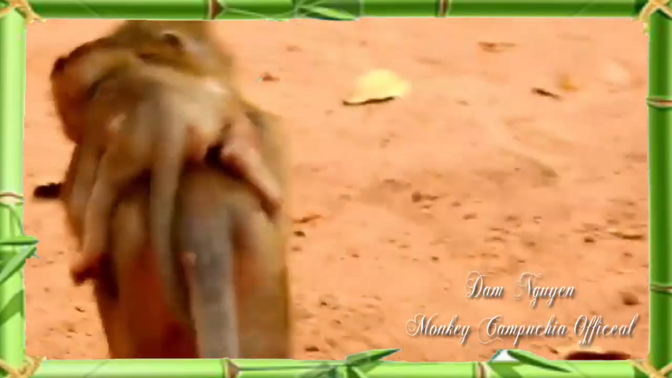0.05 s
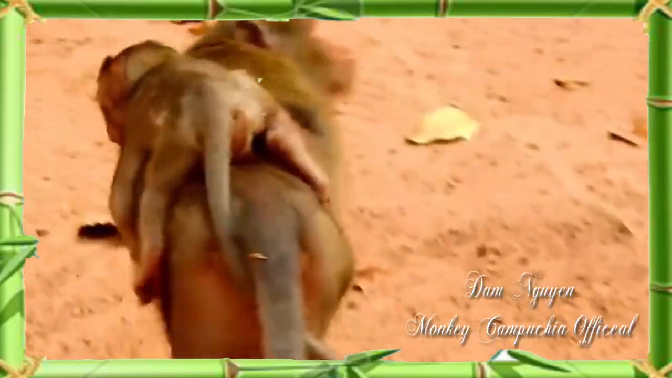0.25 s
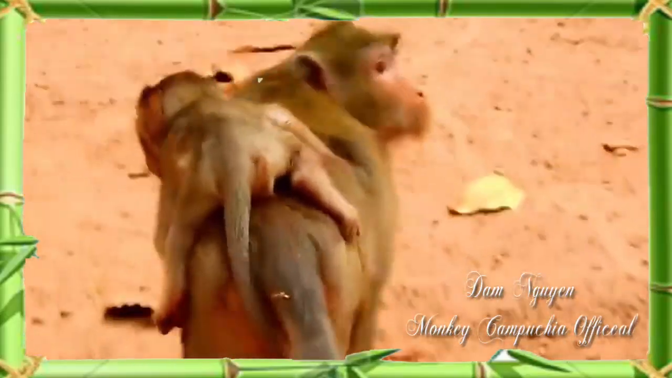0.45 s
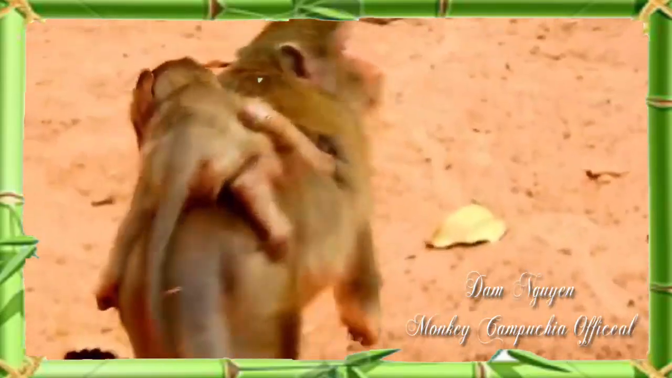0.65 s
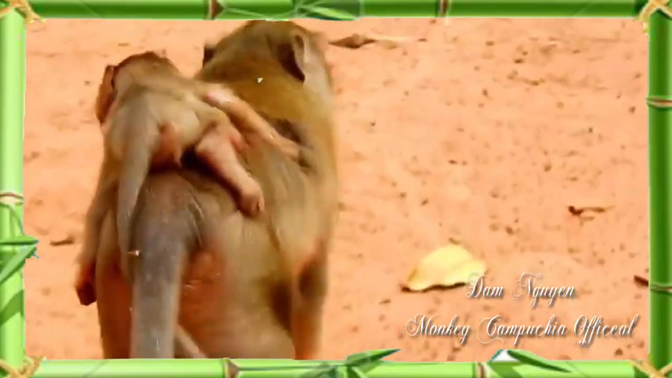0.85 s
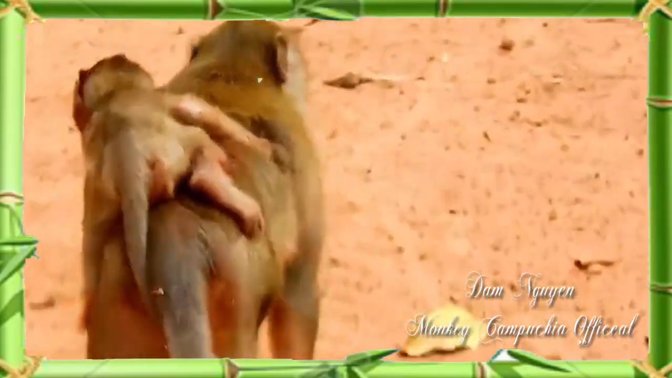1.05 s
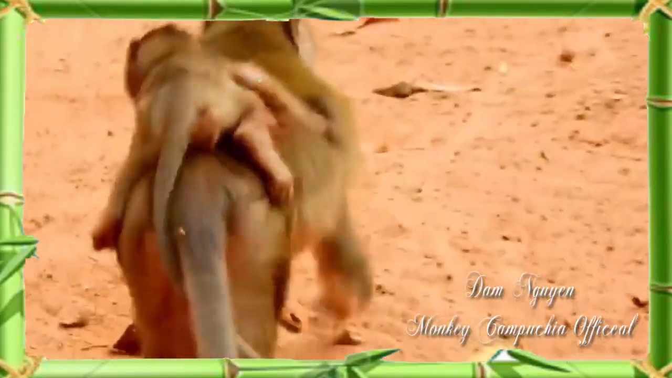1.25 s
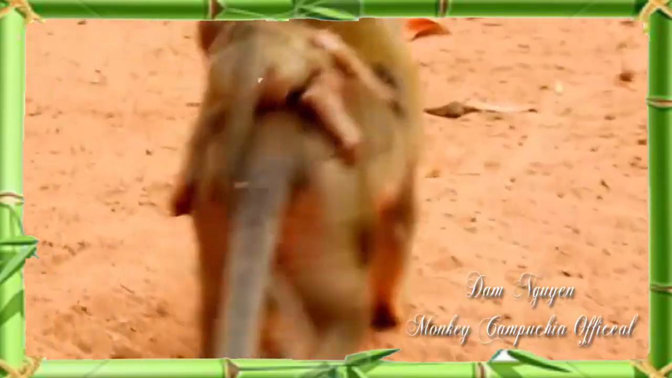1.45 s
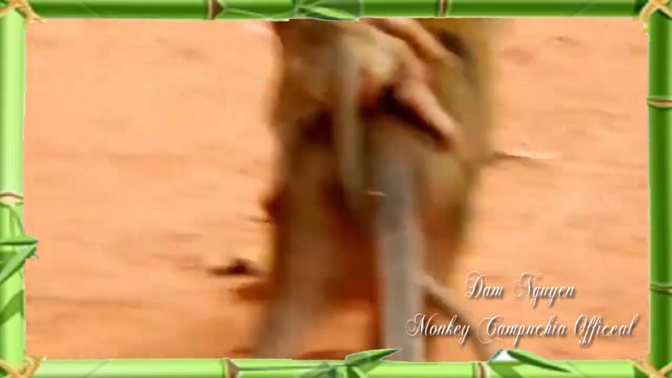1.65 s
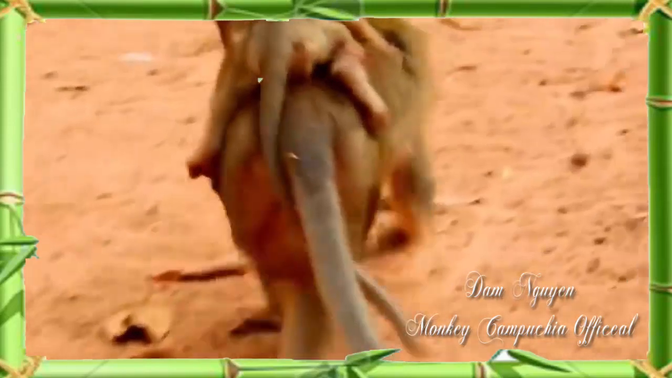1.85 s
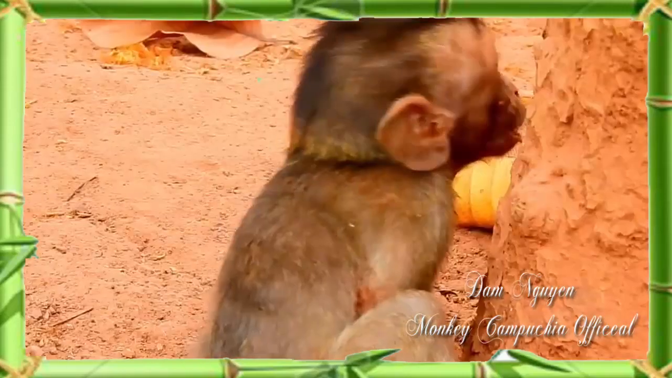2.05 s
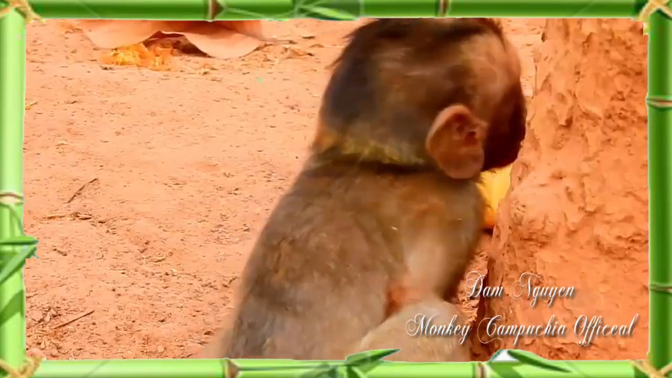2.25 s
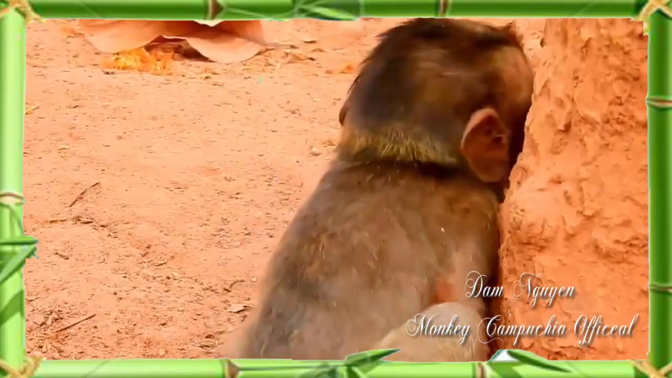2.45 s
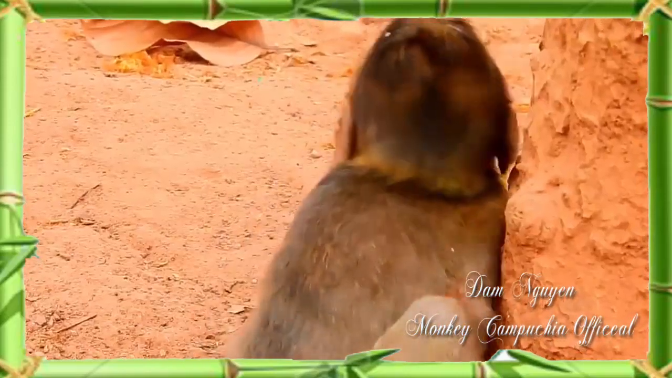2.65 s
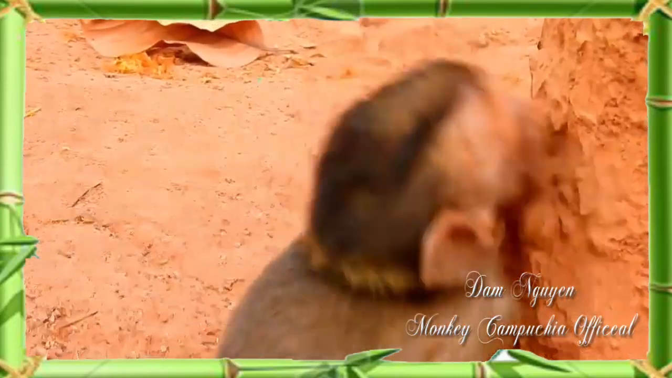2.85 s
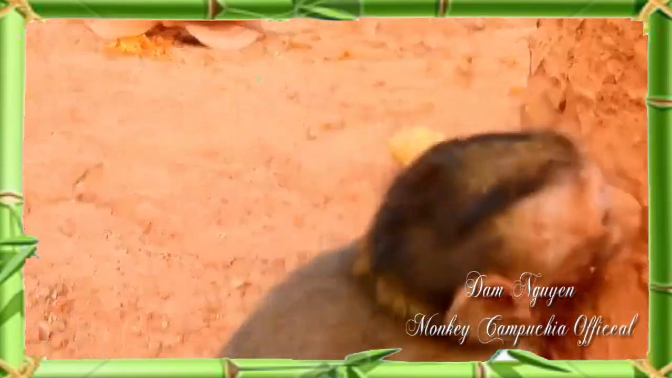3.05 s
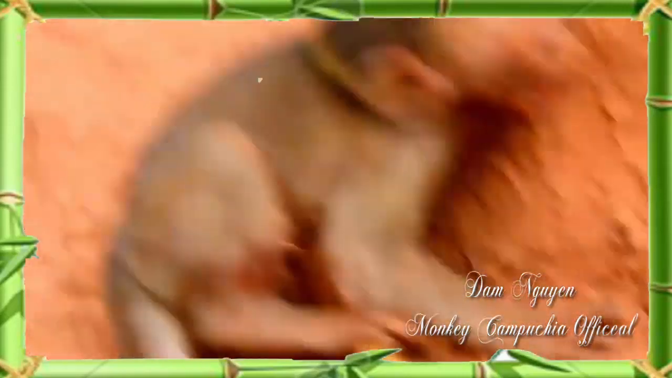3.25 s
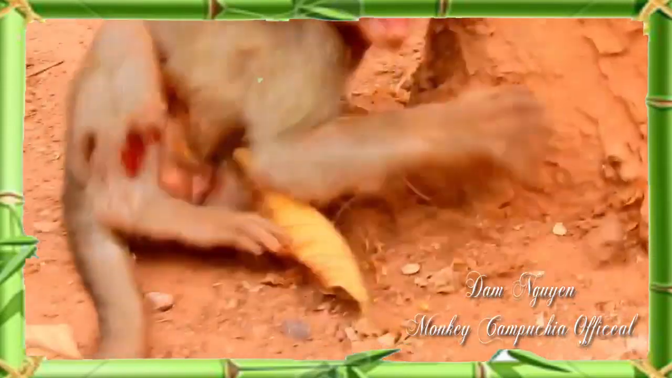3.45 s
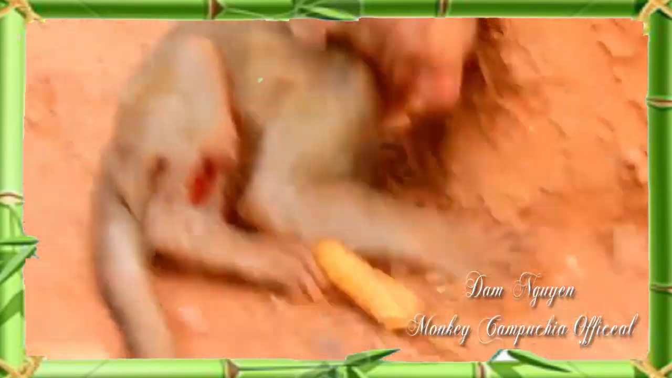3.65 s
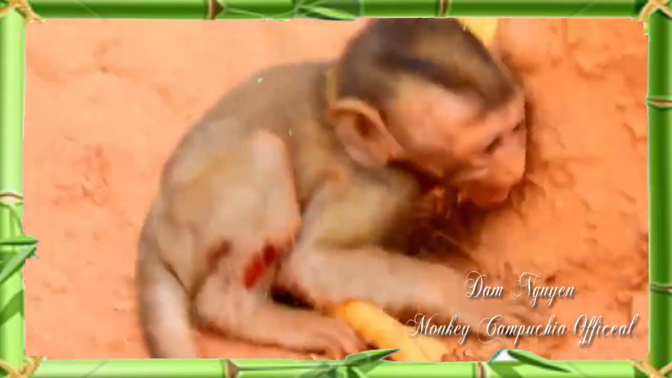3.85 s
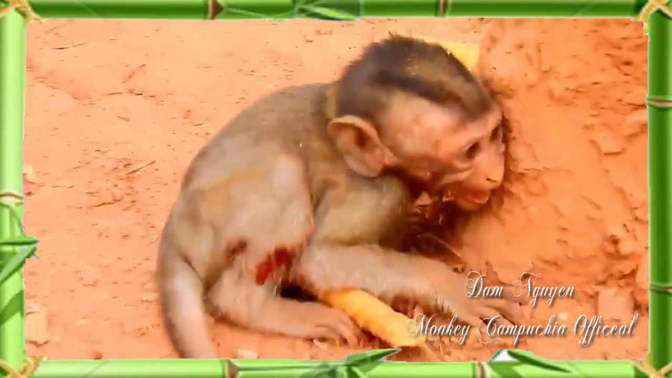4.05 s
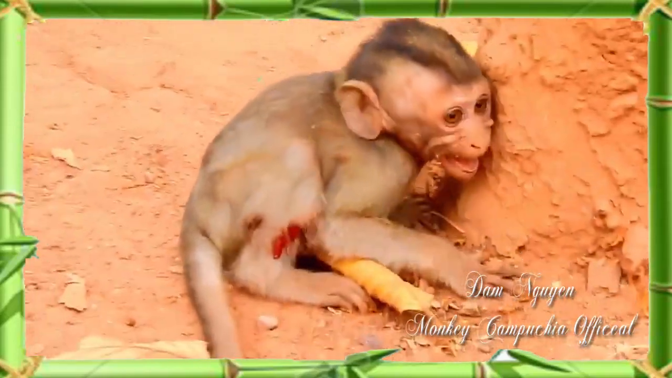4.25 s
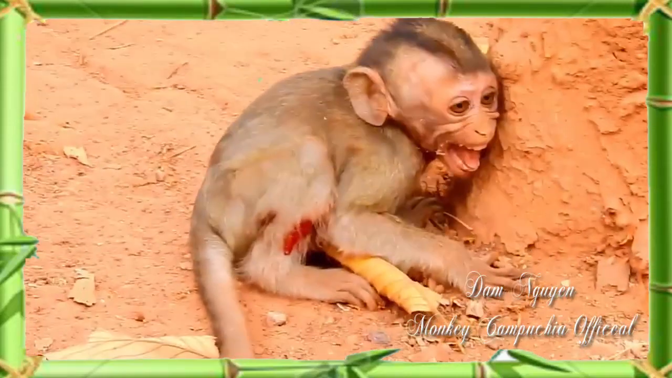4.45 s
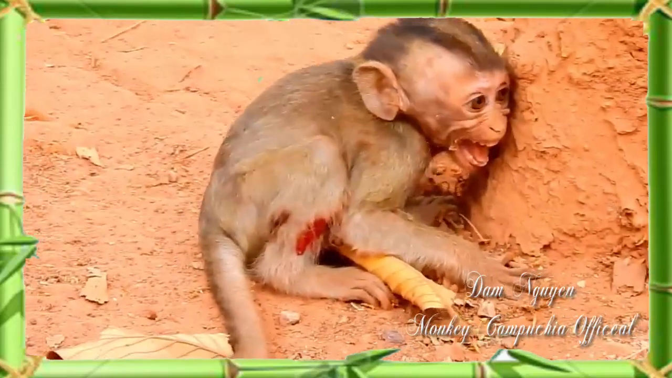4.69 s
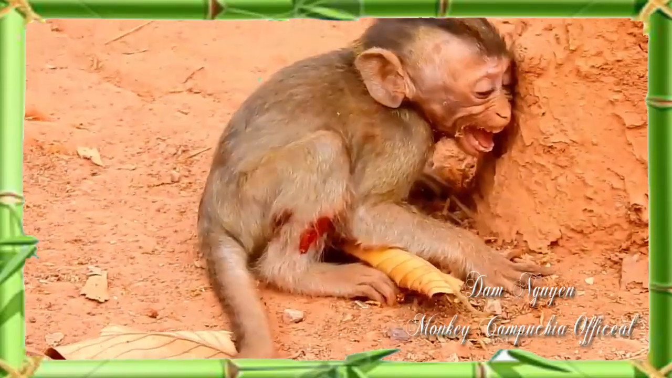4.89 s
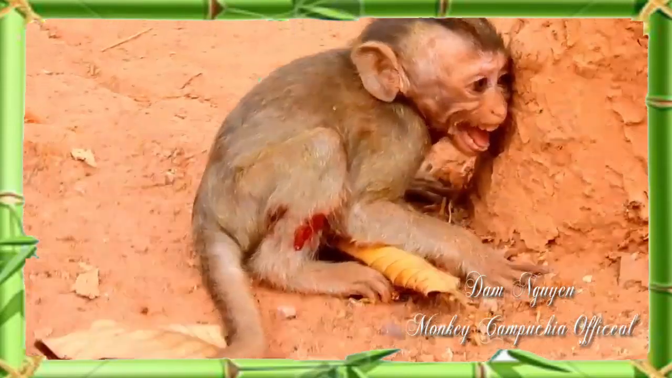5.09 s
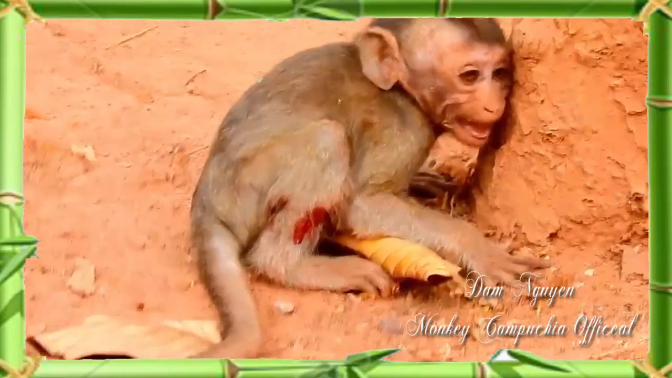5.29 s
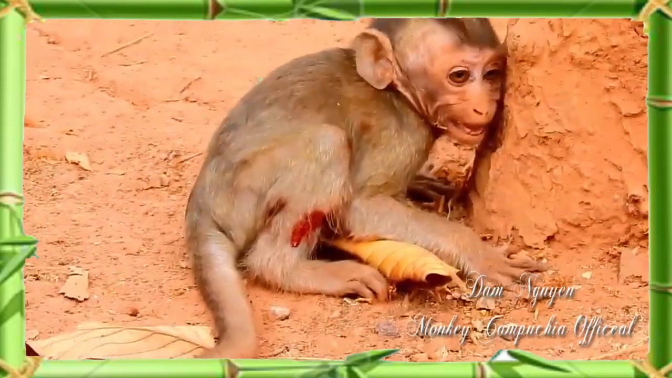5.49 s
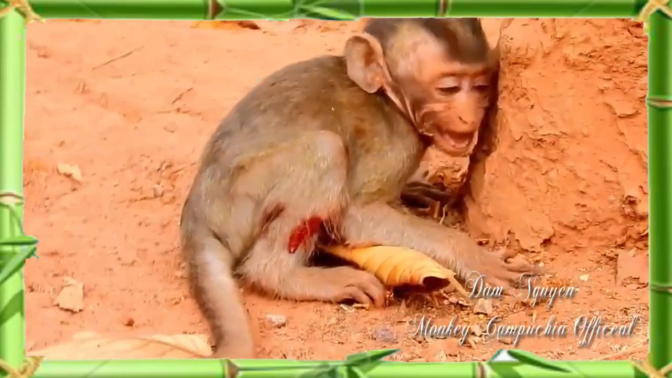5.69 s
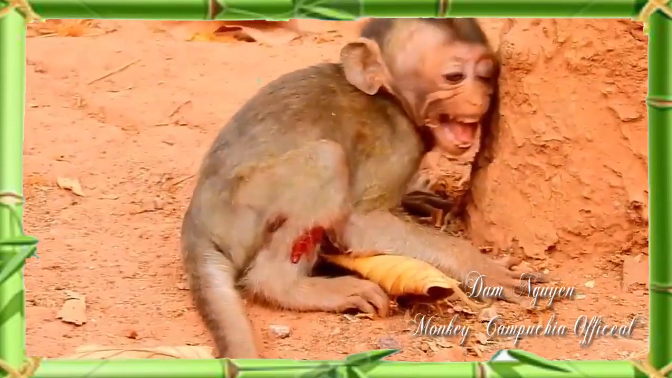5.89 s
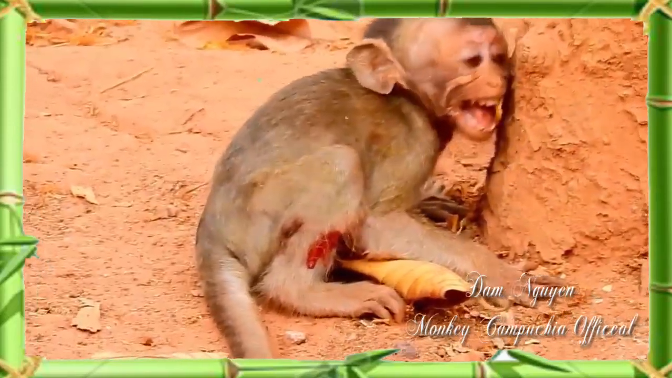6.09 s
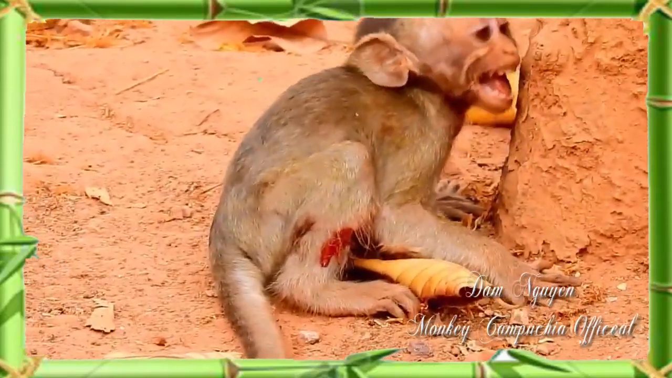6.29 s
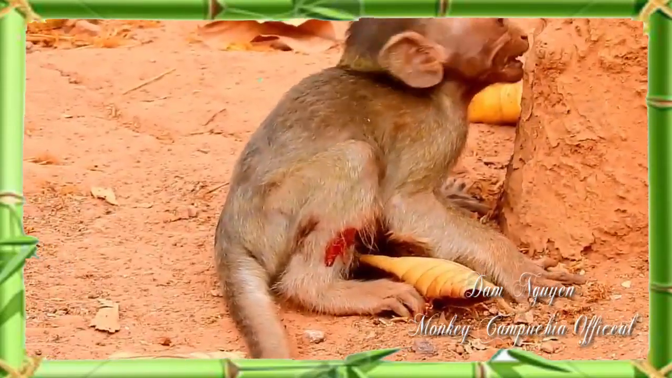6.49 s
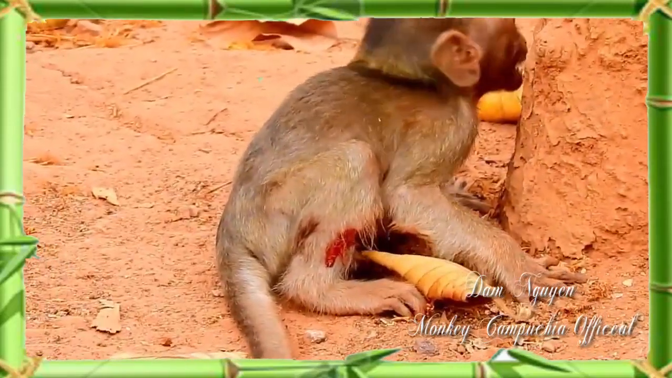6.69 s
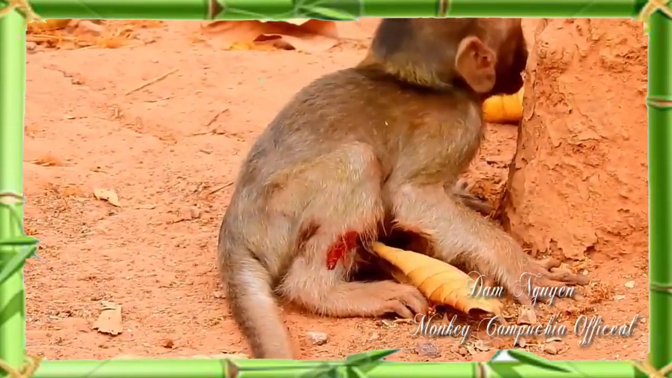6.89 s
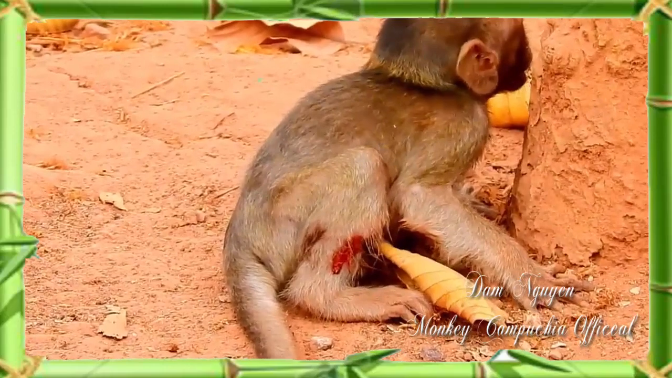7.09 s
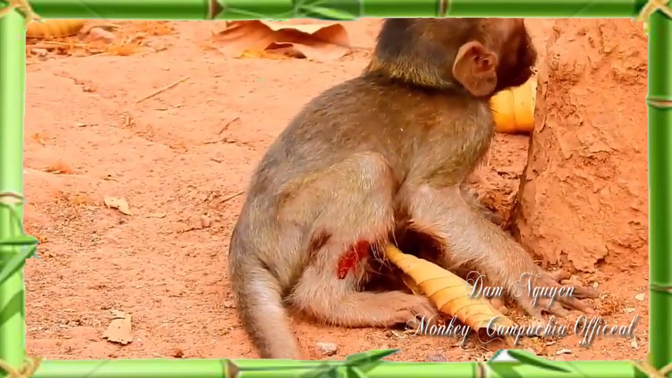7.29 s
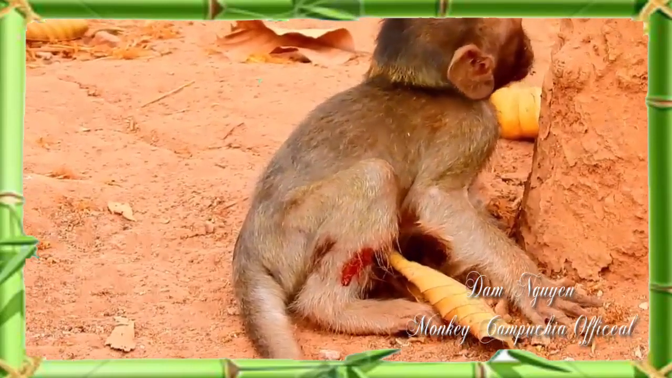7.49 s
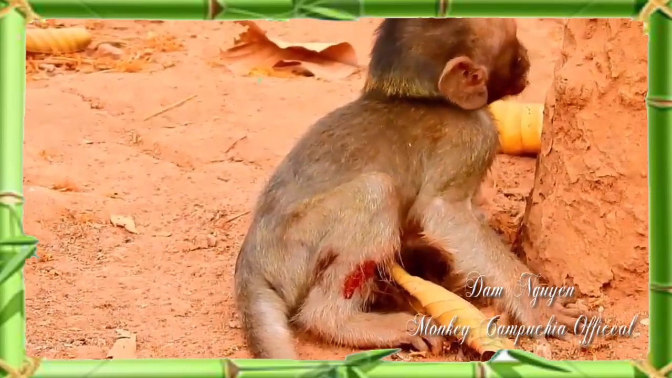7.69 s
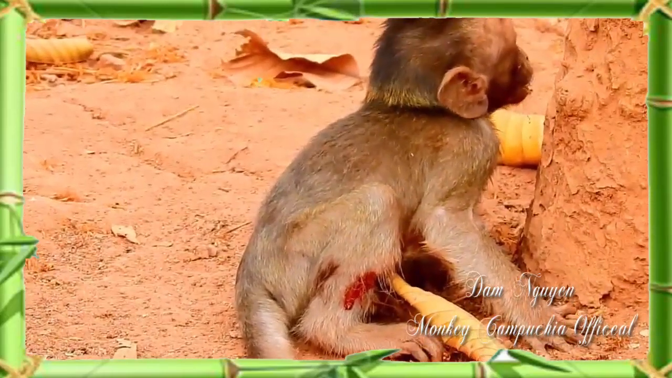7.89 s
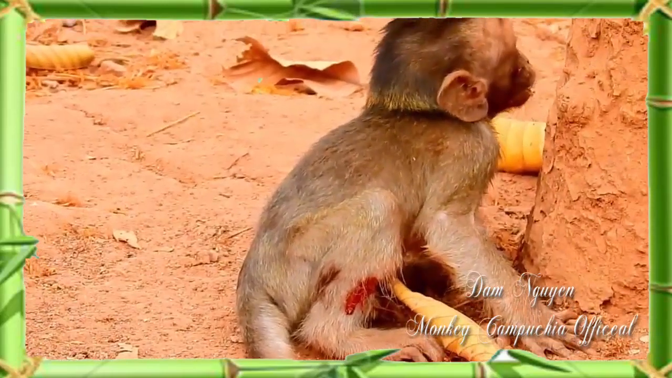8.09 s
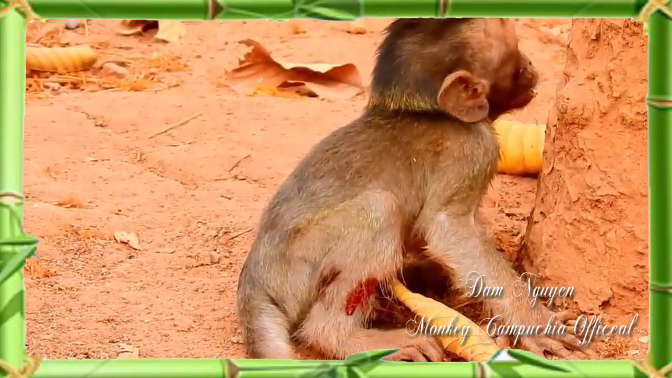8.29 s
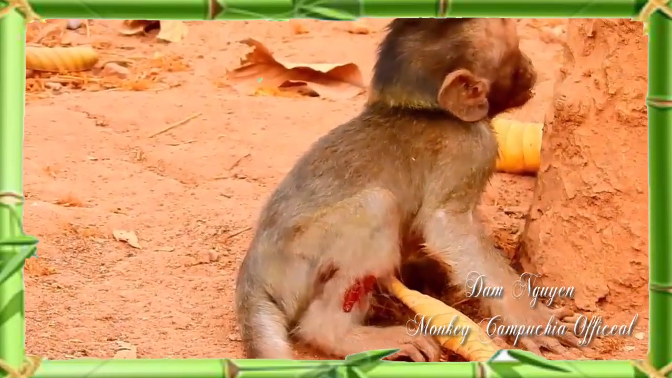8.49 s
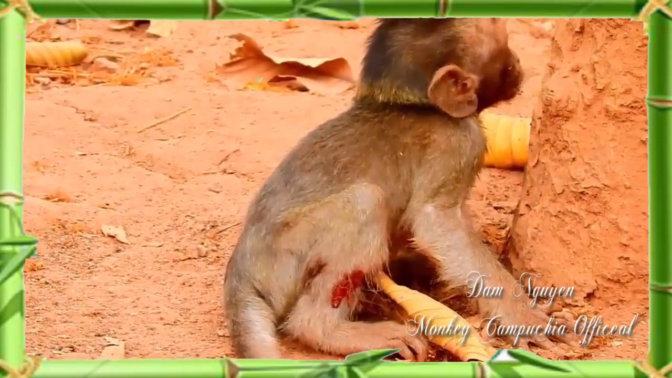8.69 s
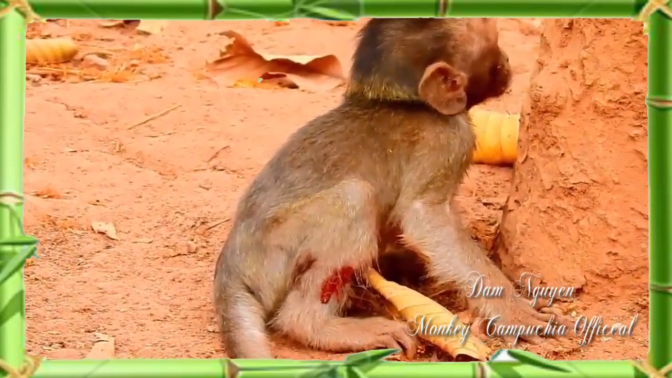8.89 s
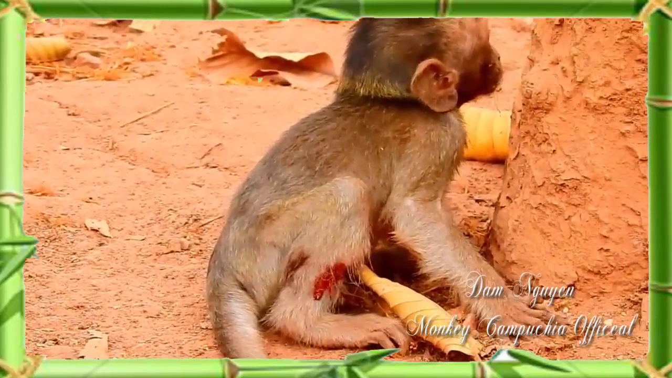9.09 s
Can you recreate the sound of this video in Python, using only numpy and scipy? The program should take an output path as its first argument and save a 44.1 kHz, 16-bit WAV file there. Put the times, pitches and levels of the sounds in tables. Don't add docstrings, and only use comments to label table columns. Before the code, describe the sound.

A baby monkey on sandy ground yaps and coos, then lets out a long raspy trembling scream, followed by two piercing whistled screams and soft coos.

```python
import sys
import numpy as np
from scipy import signal
from scipy.fft import rfft, irfft, next_fast_len
from scipy.io import wavfile
from scipy.ndimage import uniform_filter1d, minimum_filter1d, map_coordinates

SR = 44100
rng = np.random.default_rng(int(sys.argv[2]) if len(sys.argv) > 2 else 0)


def to_linear_factor(level_db):
    exponent = np.asarray(level_db, float) / 20
    return 10 ** exponent


def bounce(signal):
    frames = np.transpose(np.atleast_2d(signal))
    limited = np.clip(frames, -1, 1)
    pcm = np.round(limited * 32767).astype(np.int16)
    wavfile.write(sys.argv[1], SR, pcm)


N = 403074
T = np.arange(N) / SR


def unit(x):
    return x / np.sqrt(np.mean(x ** 2) + 1e-20)


def along(points, hz):
    f, v = np.transpose(points)
    return np.interp(np.log(hz + 1), np.log(f + 1), v)


def curves(rows):
    s, *columns = np.transpose(rows)
    return [np.interp(T, s, column) for column in columns]


def sounding(rows, edge=0.0038):
    return np.clip(np.minimum(T - rows[0][0], rows[-1][0] - T) / edge, 0, 1)


def between(start, end, attack, release):
    return np.clip(np.minimum((T - start) / attack, (end - T) / release), 0, 1)


def drift(start, end, first, last):
    return np.interp(T, [start, end], [first, last])


def swells(rows):
    return sum(to_linear_factor(db - 20 * np.maximum((s - T) / rise, (T - s) / fall)) for s, db, rise, fall in rows)


def wobble(rate):
    return map_coordinates(rng.standard_normal(int(N * rate / SR) + 4), [T * rate])


def filtered(x, response):
    m = next_fast_len(N + 8192)
    return irfft(rfft(x, m) * response(np.fft.rfftfreq(m, 1 / SR)), m)[..., :N]


def shaped(x, gain):
    hz, s, z = signal.stft(x, SR, nperseg=256)
    return signal.istft(z * gain(hz[:, None], s), SR, nperseg=256)[1][..., :N]


def patchy(x, depth_db, wide):
    z = signal.stft(x, nperseg=512)[2]
    field = uniform_filter1d(rng.standard_normal(z.shape[-2:]), wide, 0)
    field = uniform_filter1d(field, 12, 1)
    return signal.istft(z * to_linear_factor(depth_db * unit(field)), nperseg=512)[1][..., :N]


# pitch_hz, likeness (0-1)
LIKENESS = [(60, 0.6), (300, 1), (1200, 0.8), (5000, 0.63)]


def rush(spectrum, patchy_db, grain_db):
    white = rng.standard_normal((2, N)) * to_linear_factor(grain_db * wobble(900))
    pair = patchy(white, patchy_db, wide=6)

    def mid_and_side(hz):
        turn = np.arccos(np.clip(along(LIKENESS, hz), -1, 1)) / 2
        return to_linear_factor(along(spectrum, hz)) * [np.cos(turn), np.sin(turn)]

    mid, side = filtered(pair, mid_and_side)
    return unit(np.array([mid + side, mid - side]))


# time_s, engine_level_db
SCENES = [
    [(0.0, -69), (0.35, -64.5), (0.72, -70.5), (1.4, -59.5), (2.01, -67.5)],
    [(2.01, -40.5), (2.79, -47.5), (3.5, -53.5), (4.04, -48)],
    [(4.047, -39.5), (4.367, -43), (5.25, -39.5)],
    [(5.27, -36.5), (5.4, -31.5), (5.74, -36.5), (6.45, -39)],
    [(6.46, -45), (7.7, -50), (8.5, -45.5), (9.14, -39)],
]
# first_level_db, last_level_db
RUSTLE_LEVELS = [(-70, -76.5), (-64.5, -48), (-40, -45), (-38.5, -56.5), (-65, -51)]


def background():
    on = [sounding(rows, 0.002) for rows in SCENES]
    levels_db = -55 * (1 - sum(on))
    for present, rows, (first_db, last_db) in zip(on, SCENES, RUSTLE_LEVELS):
        (start, start_db), (end, end_db) = rows[0], rows[-1]
        engine_db, = curves(rows)
        swell_db = engine_db - drift(start, end, start_db, end_db)
        rustle_db = drift(start, end, first_db, last_db) + 0.74 * swell_db
        levels_db = levels_db + present * np.array([engine_db, rustle_db])
    return levels_db


# engine_tone_db, high_air_db, stereo_width (0-1), background_left_over_right_db,
# voice_left_over_right_db
STAGE = [(-7, 2.5, 1, -0.5, -3.3), (-21.5, 1, 0.93, -2.5, -1), (-11, -9, 1, -6, -1),
         (-10, -31.5, 0.98, -0.5, -1), (-2, 2, 0.2, 1, -8)]


def staged(column):
    starts = [rows[0][0] - .003 for rows in SCENES[1:]]
    return np.array(STAGE)[np.searchsorted(starts, T), column]


# multiple of the idle speed (count), level_db
ENGINE_TONES = [(2, -15.5), (4, -21.5), (5, 2.5), (6, -16), (8, -23), (10, -11.5), (12, -7), (14, -11.5),
                (17, -13)]
# pitch_hz, level_db (per Hz)
ENGINE_RUMBLE = [(15, -60), (25, -19), (75, -7.5), (130, 1.5), (179, -6.5), (316, -14), (406, -14),
                 (700, -20.5), (910, -23.5), (1540, -120)]


def engine():
    idle_hz = 26.36
    shaft = 2 * np.pi * np.cumsum(idle_hz * (1 + 0.00827 * wobble(1.5))) / SR
    tones = unit(sum(to_linear_factor(db + 2.5 * wobble(4)) * np.sin(k * shaft + rng.uniform(0, 6))
                     for k, db in ENGINE_TONES))
    return to_linear_factor(staged(column=0)) * tones + to_linear_factor(-3.0) * rush(ENGINE_RUMBLE, patchy_db=2.0, grain_db=5.0)


# pitch_hz, level_db (per Hz)
RUSTLE_COLOUR = [(290, -39), (500, -11.5), (648, -10.5), (1180, -3.5), (2100, -5.5), (3740, -12),
                 (5670, -12.5), (8300, -17), (8850, -17), (13400, -21.5), (15500, -29)]


def rustle():
    noise = rush(RUSTLE_COLOUR, patchy_db=2, grain_db=2)
    air = filtered(noise, lambda hz: 1 / (1 + (3200 / (hz + 1)) ** 6))
    return noise + (to_linear_factor(staged(column=1)) - 1) * air


def outdoors():
    engine_db, rustle_db = background()
    return to_linear_factor(engine_db) * engine() + to_linear_factor(rustle_db + 8 + 1.3 * wobble(6)) * rustle()


# peak_s, level_db, rise_s,
# fall_s
SAND_SCUFFS = [(.385, -51.5, 0.011, 0.044), (.432, -42.5, 0.031, 0.077), (.928, -47.5, 0.008, 0.05),
               (1.085, -45.5, 0.015, 0.1), (1.393, -33.5, 0.0034, 0.059), (1.466, -34.5, 0.013, 0.11),
               (3.346, -34, 0.0085, 0.031), (5.308, -34, 0.0077, 0.071), (5.996, -33, 0.93, 0.076),
               (6.294, -46, 0.15, 0.048), (6.486, -47.5, 0.021, 0.28), (6.612, -45.5, 0.0033, 0.067)]
# pitch_hz, level_db (per Hz)
SAND_COLOUR = [(290, -73), (500, -32.5), (1060, 0.5), (2750, -4.5), (3860, -16.5), (4410, -21),
               (6730, -8.5), (9000, -22), (11700, -52), (19800, -120)]


def scuffs():
    return swells(SAND_SCUFFS) * to_linear_factor(2.0) * rush(SAND_COLOUR, patchy_db=2.2, grain_db=3.5)


# peak_s, level_db, rise_s, fall_s
LEAF_SWISHES = [(.636, -59.5, 0.017, 0.092), (.885, -34.5, 0.044, 0.069), (1.17, -43.5, .02, 0.13),
                (2.79, -43.5, 0.39, 0.012), (5.436, -30, 0.084, 0.15), (6.47, -37, 0.07, 0.11)]
# pitch_hz, level_db (per Hz)
LEAF_COLOUR = [(500, -27), (1500, -32), (3400, -7.5), (4600, -15.5), (6830, 1), (8500, -14), (10800, -7),
               (15800, -26)]


def swishes():
    return swells(LEAF_SWISHES) * rush(LEAF_COLOUR, patchy_db=2.5, grain_db=1)


# time_s, edge_hz
DULL_EDGE = [(0, 8640), (6.6, 8470), (6.78, 7330), (6.9, 8140), (7.25, 8350), (7.36, 7700), (7.74, 8370),
             (7.9, 6930), (8.37, 6600), (8.46, 7200), (8.6, 8100), (9.14, 8050)]


def dulled(hz, s):
    edge_hz = np.interp(s, *np.transpose(DULL_EDGE))
    return to_linear_factor(-13 * np.clip((hz - edge_hz) / 250 + .5, 0, 1))


# start_s, peak_level_db, pitch_hz
SNAPS = [(0.0845, -24.5, 5340), (1.224, -36.5, 2010), (1.395, -25.5, 2640), (1.471, -28.5, 2860),
         (1.6383, -34.5, 1730), (2.012, -29.5, 3060), (1.0606, -29.5, 5130), (3.345, -26.5, 910),
         (6.244, -19, 786), (6.294, -20, 1306), (4.9554, -13.5, 4900), (5.292, -23, 4020)]


def ticks():
    out, t = np.zeros(N), np.arange(SR // 50) / SR
    for s, db, hz in SNAPS:
        crack = 0.27 * to_linear_factor(-60 * t / 0.0027) * rng.standard_normal(len(t))
        snap = np.sin(2 * np.pi * hz * t) + crack
        out[round(s * SR):][:len(t)] += to_linear_factor(db - 3.0 - 60 * t / 0.012) * snap
    return out


# start_s, length_s, first_pitch_hz, last_pitch_hz, level_db
CLEAR_GLIDES = [(1.286, .092, 8090, 3600, -37), (2.677, 0.013, 5740, 7070, -34),
                (2.796, 0.024, 6140, 5340, -43.5), (3.096, .03, 8850, 8960, -29.5),
                (3.145, .035, 9160, 8970, -34), (4.395, 0.046, 3700, 4800, -28),
                (4.007, 0.01, 7500, 8200, -31.5), (4.015, 0.014, 8000, 5230, -8),
                (5.695, 0.03, 1334, 1840, -32.5), (5.709, 0.027, 6350, 7980, -33.5),
                (5.723, 0.021, 5930, 7960, -33.5), (5.724, 0.046, 2365, 2910, -29),
                (5.734, 0.033, 7220, 7800, -40.5), (5.811, 0.023, 6100, 8070, -24),
                (6.39, .03, 7350, 7120, -30), (6.423, .014, 7180, 7300, -25.5),
                (6.436, 0.0095, 7320, 4330, -20.5)]
# start_s, length_s, first_pitch_hz, last_pitch_hz, level_db
HOARSE_GLIDES = [(0.021, 0.033, 4600, 3010, -45), (0.115, 0.049, 3250, 4720, -44),
                 (0.194, 0.029, 4900, 3250, -46), (0.26, 0.044, 2280, 2080, -55.5),
                 (1.122, 0.038, 4580, 3090, -44), (2.454, 0.071, 2350, 2360, -44),
                 (2.5, 0.19, 2200, 2075, -57.5), (2.632, .13, 2830, 12130, -46.5),
                 (2.764, 0.15, 12200, 9600, -56), (2.827, 0.26, 4680, 4906, -38),
                 (3.089, .1, 8940, 9080, -32), (3.203, 0.035, 8700, 8450, -37),
                 (3.902, 0.011, 4380, 4190, -25), (3.915, 0.023, 7500, 6220, -27),
                 (3.935, 0.039, 4400, 4090, -29.5), (3.974, 0.026, 7100, 6600, -15.5),
                 (4.374, 0.025, 3200, 3730, -29), (4.412, 0.038, 4000, 5110, -29),
                 (5.28, 0.024, 3620, 4730, -40.5)]


def squeaks():
    out = np.zeros(N)
    hoarse = wobble(900) + 1j * wobble(900)
    for rows, rough in [(CLEAR_GLIDES, .26), (HOARSE_GLIDES, .75)]:
        for s, length, first_hz, last_hz, db in rows:
            u = np.linspace(0, 1, int(length * SR))
            phase = 2 * np.pi * np.cumsum(first_hz + (last_hz - first_hz) * u ** 1.15) / SR
            folds = 1 - rough + rough * hoarse[round(s * SR):][:len(u)]
            swell = to_linear_factor(db + 8.5) * np.sin(np.pi * u) ** 0.36
            out[round(s * SR):][:len(u)] += swell * np.imag(folds * np.exp(1j * phase))
    return out


# time_s, pitch_hz, effort_db, mouth_opening_db (lift of the overtone above the strongest)
COO_CALLS = [
    [(2.013, 1480, -36, 5), (2.08, 1434, -45, -4), (2.13, 1580, -29.5, 1.5), (2.2, 1620, -32, -5.5),
     (2.285, 1693, -37.5, -5.5), (2.315, 1586, -31, -6.5)],
    [(6.77, 1093, -91, 21), (6.86, 1245, -68, 19.5), (6.915, 1417, -45, 23.5), (7.025, 1366, -48.5, 19.5),
     (7.07, 1477, -22.5, -10), (7.105, 1500, -22, -3.5), (7.165, 1430, -24, -0.5), (7.21, 1382, -37, -4.5),
     (7.335, 1232, -49, -16)],
    [(7.8, 1163, -58, -10), (7.89, 1275, -49, -5), (7.97, 1293, -46, -8), (8.02, 1317, -47.5, -3),
     (8.14, 1350, -49, -1), (8.25, 1319, -52.5, -3), (8.39, 1280, -55.5, 0), (8.47, 1186, -53, -13)],
]
# multiple of the pitch (count), level_db, then each enter_s and leave_s
COO_OVERTONES = [
    [(1, -23), (2, 0), (3, -11), (4, -17), (5, -15), (6, -30), (7, -40), (8, -38)],
    [(1, -27), (2, -21, 7.065, 7.3), (3, 0), (4, -11), (5, -40), (6, -42)],
    [(1, -4), (2, -21), (3, 0, 7.865, 8.46), (4, -14, 7.8, 7.96), (5, -20, 8.06, 8.5),
     (6, -3, 8.055, 8.445), (7, -14, 7.88, 7.985, 8.42, 8.5), (8, -45), (9, -22, 8.0, 8.3)],
]


def coos():
    out = np.zeros(N)
    fundamentals = [(-38, -74), (-55.5, -48.5), (-58, -50)]
    flutter_hz, waver = 95, 3.5
    for rows, overtones, (first_db, last_db) in zip(COO_CALLS, COO_OVERTONES, fundamentals):
        pitch_hz, high_db, lift_db = uniform_filter1d(curves(rows), SR // 60)
        flutter = np.clip((high_db + 36) / 12, .1, 1)
        beat = flutter * np.sin(2 * np.pi * flutter_hz * T + 2.5 * wobble(40))
        bend = .019 * flutter * beat + 0.005 * wobble(150) + 0.0047 * wobble(16)
        phase = 2 * np.pi * np.cumsum(pitch_hz * (1 + bend)) / SR
        lead, lead_db, *_ = max(overtones[1:], key=lambda row: row[1])
        low_db = drift(rows[0][0], rows[-1][0], first_db, last_db) - 7.8 * flutter + waver * wobble(17)
        tone = to_linear_factor(low_db) * sounding(rows, 0.023) * np.sin(phase)
        for k, db, *entry in overtones[1:]:
            unsteady = .7 * wobble(22) + 0.83 * wobble(55) + (k > lead + 1) * (wobble(5) - 2)
            waver_db = waver * (1 - 0.58 * flutter) * unsteady
            level = to_linear_factor(high_db + db - lead_db + lift_db * (k == lead + 1) + waver_db)
            if entry:
                level = level * uniform_filter1d(np.searchsorted(entry, T) % 2., size=300)
            tone += level * np.sin(k * phase)
        out += np.sqrt(2) * sounding(rows, 0.0015) * (1 + .33 * beat) * tone
    return out


# time_s, pitch_swing (share)
BREATH_CRESTS = [(2.799, 0), (2.931, 0.069), (3.041, 0.066), (3.33, 0.036), (3.489, 0.066), (3.699, 0.047),
                 (4.469, 0.019), (4.595, .05), (4.785, .042), (4.845, .04), (4.957, .045), (5.185, .045),
                 (5.885, 0.014), (6.008, .025), (6.143, 0.037), (6.465, .045)]
CREST_BEATS = [0, 1, 2, 1, 3, 4, 1, 2, 4, 1, 1, 4, 1, 3, 2, 6]


def tremor():
    s, swing = np.transpose(BREATH_CRESTS)
    wave = np.cos(2 * np.pi * np.interp(T, s, np.cumsum(CREST_BEATS)))
    return wave, np.interp(T, s, swing) * to_linear_factor(1.5 * wobble(15))


# time_s, pitch_hz, whistle_level_db, half_pitch_level_db
WHISTLED_SCREAMS = [
    [(4.388, 4730, -15, -47), (4.4, 6230, -20.5, -35.5), (4.414, 8570, -36, -31),
     (4.445, 10260, -46.5, -28.5), (4.6, 9980, -39, -21), (4.9, 9990, -31.5, -24), (5.058, 9890, -38, -28),
     (5.2, 10000, -29, -49), (5.225, 8500, -22.5, -37)],
    [(5.875, 11020, -38, -86), (5.959, 11770, -39.5, -67), (5.98, 11120, -33, -33.5),
     (6.033, 9460, -42, -26.5), (6.075, 8920, -42, -22.5), (6.109, 8260, -38.5, -28.5),
     (6.26, 8270, -40.5, -26), (6.413, 8150, -53, -25.5), (6.42, 8950, -50, -36)],
]
# level_between_surges_db, quarter_pitch_overtone_db, chaos_width_hz,
# chaos_centre (share of the pitch)
SCREAM_THROB = [
    (0, -44, 2300, .56),
    (-7, -14, 1300, .52),
]
# start_s, end_s, steadiness (share)
STEADY_SPELLS = [(4.537, 4.6, .92), (4.6, 4.622, .5), (4.622, 4.656, .92), (4.672, 4.71, .6),
                 (4.768, 4.802, .92), (4.82, 4.905, .9), (4.955, 5.035, .95), (5.035, 5.055, .6),
                 (5.055, 5.1, .92), (5.1, 5.135, .7), (5.968, 6.11, .94), (6.13, 6.152, .9),
                 (6.183, 6.205, .5), (6.238, 6.256, .8), (6.278, 6.314, .75), (6.347, 6.376, .9)]
# peak_s, half_width_s, level_db, pitch_shift (share)
HALF_SURGES = [(4.69, .03, 3.5, 0), (4.733, 0.014, -8.5, -0.0039), (4.76, .012, 1.5, 0),
               (6.036, .008, 3.5, 0), (6.047, .003, -6.5, -0.0043), (6.062, 0.0017, -14.5, 0),
               (6.0755, .002, -12.5, 0.0046), (6.07, 0.018, 9, 0), (6.097, 0.0035, -5, -0.014),
               (6.141, .008, 11.5, -.03), (6.192, .011, 12, 0.037), (6.245, 0.0056, 14, -.02),
               (6.296, 0.015, 12, 0.04), (6.33, 0.0085, 7, -0.0078), (6.361, 0.0092, 13, 0.019),
               (6.405, .012, 8.5, 0.015)]


def whistles(wave, swing):
    out = np.zeros(N)
    steady = sum(share * between(a - .002, b + .002, .004, .004) for a, b, share in STEADY_SPELLS)
    steady = np.clip(steady, 0, .95)
    surge_db, shift = sum(np.exp(-((T - s) / width) ** 2) * np.array([[db], [share]])
                          for s, width, db, share in HALF_SURGES)
    for rows, (rest_db, quarter_db, chaos_hz, centre) in zip(WHISTLED_SCREAMS, SCREAM_THROB):
        pitch_hz, top_db, half_db = curves(rows)
        bend = swing * wave + shift + 0.013 * wobble(400)
        phase = 2 * np.pi * np.cumsum(pitch_hz * (1 + bend)) / SR

        roughness = np.clip((T - 6) / 0.1, 0, 1) * 1.5 * to_linear_factor(quarter_db) * wobble(900)
        top = to_linear_factor(top_db + 60 * swing * wave + 4.1 * wobble(130)) * (1 + roughness) * np.sin(phase)

        chaos = wobble(chaos_hz) * np.sin(phase * centre) + wobble(chaos_hz) * np.cos(phase * centre)
        throb = to_linear_factor(rest_db * np.clip((T - 6.1) / .02, 0, 1) + surge_db)
        half = throb * (np.sqrt(steady) * np.sin(phase / 2) + np.sqrt(1 - steady) * .72 * chaos)

        quarter = to_linear_factor(quarter_db) * throb * np.clip((T - 6.03) / .06, 0, 1) * wobble(900)
        over = quarter * np.sin(phase * 5 / 4) + to_linear_factor(-31) * wobble(1500) * np.sin(phase * 3 / 2)
        lower = to_linear_factor(half_db + 1.5 * wobble(120)) * (half + over)
        out += np.sqrt(2) * sounding(rows, 0.0044) * (top + lower)
    return out


# start_s, end_s, first_level_db, last_level_db, lips_db (added to the level)
UNDER_BREATHS = [(4.41, 5.227, -41.5, -50.5, 6), (6.033, 6.429, -43, -39, 6.5)]
# throat_db, mouth_db
BREATH_PARTS = [
    (0, -22),
    (-8, 0),
]


def breath():
    gains = 0
    for (a, b, first_db, last_db, lips_db), (throat_db, mouth_db) in zip(UNDER_BREATHS, BREATH_PARTS):
        level = between(a, b, 0.016, 0.0067) * to_linear_factor(drift(a, b, first_db, last_db))
        gains = gains + level * to_linear_factor([[throat_db], [mouth_db], [lips_db]])
    return gains


def tract_gains(db, mouth_db, lips_db):
    share = 1 / (1 + to_linear_factor(-2 * mouth_db))
    return to_linear_factor(db) * np.array([np.sqrt(1 - share), np.sqrt(share), to_linear_factor(-lips_db)])


# time_s, effort_db, mouth_over_throat_db, lips_under_voice_db
LONG_SCREAM = [(2.815, -49.5, -2.5, 7), (2.9, -29, -13.5, 6), (2.998, -23.5, 1, 6), (3.15, -24, -1, 9.5),
               (3.3, -20, -4.5, 6), (3.47, -18.5, 4, 5), (3.7, -4.5, 6.5, 6.5), (3.8, -16, -4, 6),
               (3.845, -12, -11, 12)]
# start_s, length_s, level_db, mouth_over_throat_db, lips_under_voice_db
ROUGH_YAPS = [(0.0, 0.069, -32.5, -3.5, 30), (1.057, 0.12, -31, -13, 27), (1.272, 0.041, -29.5, -20, 31),
              (1.296, 0.098, -42, -4.5, 16)]
# start_s, length_s, level_db, mouth_over_throat_db, lips_under_voice_db
SWELLING_GRUNTS = [(0.112, 0.106, -33, -2, 24), (.235, 0.073, -43, 5, 17)]
# start_s, length_s, level_db, mouth_over_throat_db, lips_under_voice_db
END_BARKS = [(3.86, 0.175, -15, -7, 17), (4.983, .014, -25.5, -1.5, 20), (5.088, 0.0093, -39, 0, 20),
             (5.148, 0.026, -31, -3, 20), (5.216, 0.049, -14, 0.5, 21)]
# attack_s, release_s, level_lost_db, mouth_opening_lost_db (a third of each is lost by
CALL_SHAPES = [
    (0.0018, 0.036, 6.5, 7),
    (0.029, 0.022, -5, 25),
    (.003, 0.0079, 0.5, 7.5),
]


def effort():
    gains = sounding(LONG_SCREAM) * tract_gains(*curves(LONG_SCREAM))
    calls = [ROUGH_YAPS, SWELLING_GRUNTS, END_BARKS]
    for rows, (attack, release, sag_db, closing_db) in zip(calls, CALL_SHAPES):
        for s, length, db, mouth_db, lips_db in rows:
            done = drift(s, s + length, 0, 0.33)
            closing = closing_db * done
            envelope = between(s, s + length, attack, release) ** np.array([[1], [4], [4]])
            gains += envelope * tract_gains(db - sag_db * done, mouth_db - closing, lips_db + closing)
    catches = sum(np.exp(-((T - s) / 0.0067) ** 2) for s in [3.09, 3.16, 3.224, 3.911, 3.958, 4.005])
    return gains * to_linear_factor(-6.5 * catches)


# time_s, lowest_colour_hz, bright_ring_hz, bright_lift_db
MOUTH_MOVES = [(0.03, 2550, 4830, 3), (0.16, 2380, 5170, 5.5), (0.28, 2200, 6800, 0), (1.1, 2460, 5600, 5),
               (2.85, 4180, 4790, 2), (2.98, 3900, 4720, 1), (3.02, 3840, 7300, -1),
               (3.09, 3570, 9000, 1.5), (3.21, 3580, 8700, 4.5), (3.25, 3196, 6940, 8.5),
               (3.38, 2880, 7370, 6), (3.46, 4320, 7600, 2.5), (3.58, 4710, 7180, 9), (3.66, 4200, 8140, 2),
               (3.78, 4280, 9050, 7.5), (3.85, 4300, 5300, 4), (3.96, 3970, 6100, 3.5),
               (4.04, 3960, 6440, 6)]


def mouth(hz, s):
    at, *columns = np.transpose(MOUTH_MOVES)
    edge_hz, bright_hz, lift_db = [np.interp(s, at, column) for column in columns]
    below_db = -9 / (1 + (hz / edge_hz) ** 12)
    throat_db = 4.5 * (np.exp(-((hz / edge_hz - 1.17) / .12) ** 2) - .3)
    bright_db = lift_db * (np.exp(-((hz - bright_hz) / 750) ** 2) - .5)
    return to_linear_factor(below_db + throat_db + bright_db)


# time_s, jitter (share of a cycle)
FOLD_JITTER = [(0, .2), (2.9, .2), (2.98, .07), (3.035, .014), (3.1, .07), (3.3, .03), (3.36, .026),
               (3.44, .016), (3.5, .008), (3.6, .011), (3.67, .014), (3.73, .035), (3.77, .07), (3.86, .07)]
# centre_hz, width_hz
TRACT_RINGS = [
    (4950, 5330),
    (7300, 3600),
    (9500, 7050),
]


def fold_pulses(wave, swing):
    fold_hz = 1053
    cycles = np.cumsum(fold_hz * (1 + swing * wave + 0.022 * wobble(90))) / SR
    s = np.interp(np.arange(1, int(cycles[-1])), cycles, T)
    chance = rng.standard_normal((len(s), 2))
    jitter = np.interp(s, T, curves(FOLD_JITTER)[0] * to_linear_factor(3.5 * wobble(25)))
    at = (s + jitter * chance[:, 0] / fold_hz) * SR
    near = np.floor(at)[:, None] + np.arange(-7, 9)
    away = near - at[:, None]
    taps = np.sinc(away) * np.cos(np.pi * away / 16) ** 2
    strength = to_linear_factor(np.minimum(1 + 20 * jitter[:, None], 2.5) * chance[:, 1:])
    return np.bincount(np.clip(near, 0, N - 1).astype(int).ravel(), (taps * strength).ravel(), N)


def rasp(wave, swing):
    source = unit(fold_pulses(wave, swing)) + .35 * to_linear_factor(3 * wobble(40)) * rng.standard_normal(N)
    source = patchy(source, 3.6, wide=7)
    throat = source + .6 * to_linear_factor(5.0 * wobble(300)) * rng.standard_normal(N)

    def ring(x, centre, width):
        return unit(filtered(x, lambda f: (1j * f * width / (centre ** 2 - f * f + 1j * f * width)) ** 6))

    parts = [ring(x, centre, width) for x, (centre, width) in zip([throat, source, source], TRACT_RINGS)]
    under = breath() * to_linear_factor(-2.5 * wave)
    gains = effort() * to_linear_factor(0.43 * wave + 2.4 * wobble(60)) + under
    return shaped(np.sum(gains * parts, axis=0), mouth)


def nearby(x):
    t = np.arange(SR // 3) / SR
    decay_s = np.array([.02, .3])[:, None, None]
    early, late = rng.standard_normal((2, 2, len(t))) * to_linear_factor(-60 * t / decay_s)
    tail = to_linear_factor(-7) * early / np.linalg.norm(early[0]) + to_linear_factor(-21) * late / np.linalg.norm(late[0])
    moving = to_linear_factor(-16.5) * np.outer([1, -1], x * wobble(30))
    heard = x + signal.fftconvolve(x[None], tail, axes=1)[:, :N] + moving
    return heard * np.linalg.norm(heard) / np.sqrt(2) / np.linalg.norm(heard, axis=1)[:, None]


def panned(x, db):
    return x * to_linear_factor(np.array([db, -db]) / 2)


def scene():
    wave, swing = tremor()
    dropout = between(3.8445, 3.8605, 0.00041, .001)
    voice = rasp(wave, swing) + whistles(wave, swing) + squeaks() + coos() + ticks()
    around = shaped(scuffs() + swishes() + outdoors(), dulled)
    front = panned(nearby(voice) * (1 - dropout), staged(column=4))
    back = panned(around * (1 - 0.89 * dropout), staged(column=3))
    left, right = front + back
    side = staged(column=2) * (left - right) / 2
    return (left + right) / 2 + np.array([side, -side])


# pitch_hz, reach_db
GATE_REACH = [(6900, 90), (7300, 0), (9000, 0), (12000, 4), (14000, 14)]
SCENE_REACH = [34, 41, 29, 34, 60]


def masked(x):
    hz, s, z = signal.stft(x, SR, nperseg=2048)
    power = uniform_filter1d(np.sum(np.abs(z) ** 2, axis=0), size=24, axis=0)
    scene_number = np.searchsorted([rows[0][0] for rows in SCENES[1:]], s)
    reach_db = np.array(SCENE_REACH)[scene_number] + along(GATE_REACH, hz)[:, None]
    weak = power < power[hz > 1000].max(axis=0) * to_linear_factor(-2 * reach_db)
    return signal.istft(z * ~weak, SR, nperseg=2048)[1][:, :N]


def top_cut(x):
    return signal.sosfilt(signal.butter(12, 16540, fs=SR, output="sos"), x)


def record(dry):
    ceiling, hold_s = .43, .012
    span = round(hold_s * SR)
    needed = np.minimum(1, ceiling / (np.abs(dry).max(axis=0) + 1e-9))
    soft = dry * uniform_filter1d(minimum_filter1d(needed, span), span)
    mix = filtered(masked(soft), lambda hz: hz < 15750)
    return top_cut(mix)


dry = scene()
out = record(dry)
bounce(out)
```